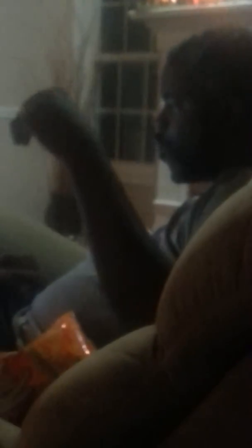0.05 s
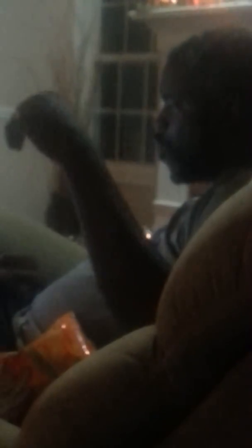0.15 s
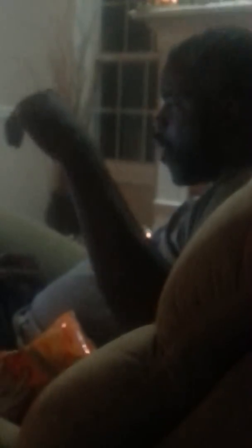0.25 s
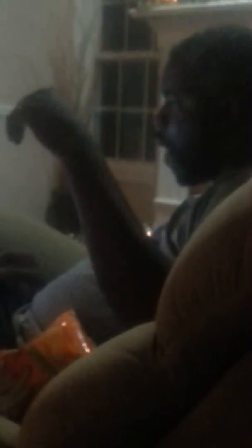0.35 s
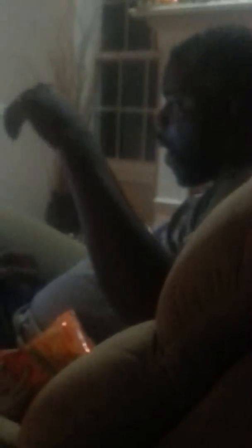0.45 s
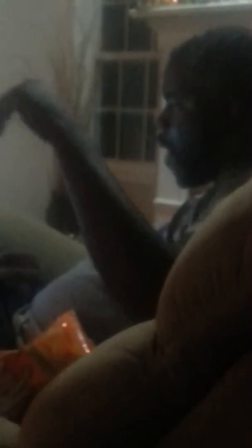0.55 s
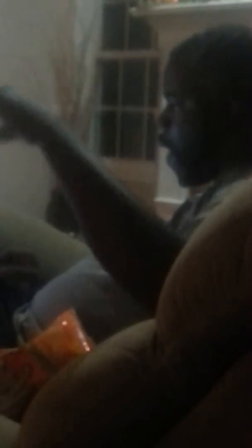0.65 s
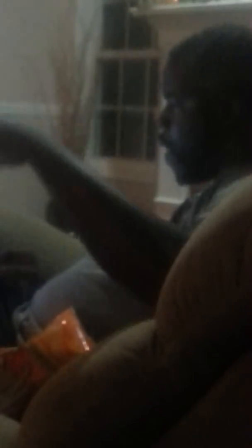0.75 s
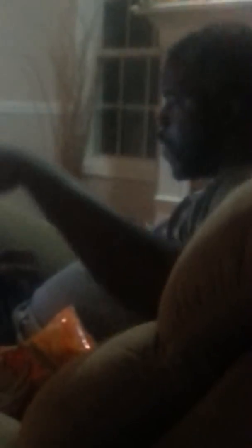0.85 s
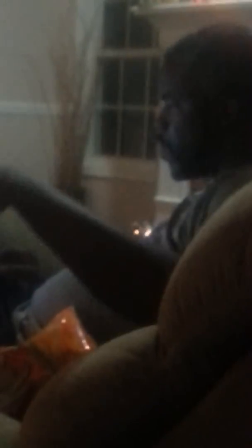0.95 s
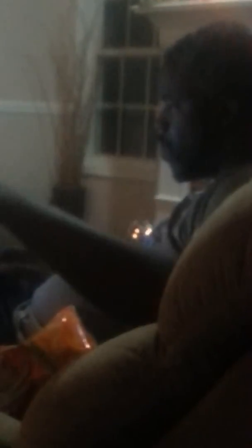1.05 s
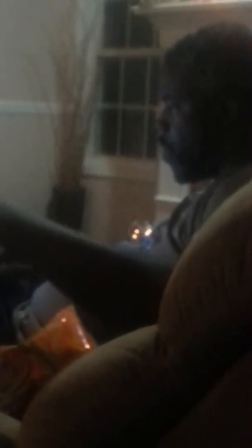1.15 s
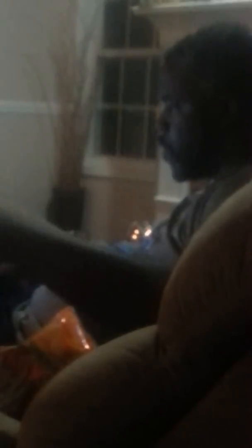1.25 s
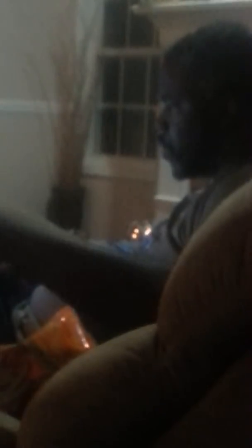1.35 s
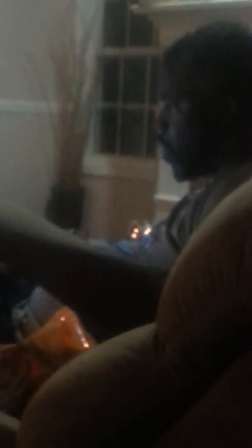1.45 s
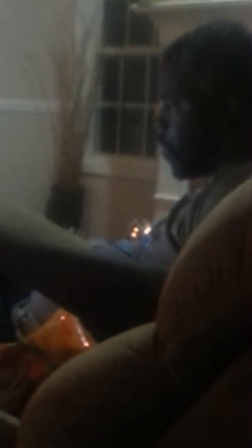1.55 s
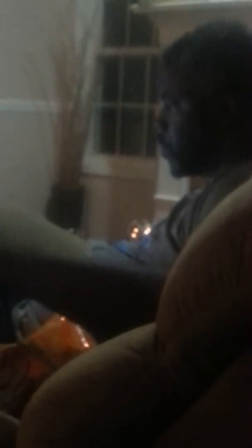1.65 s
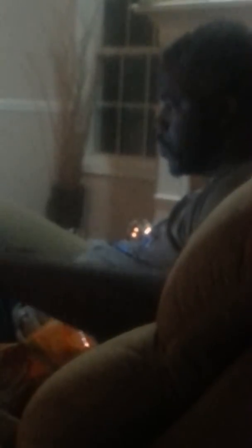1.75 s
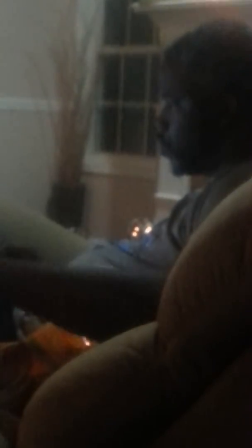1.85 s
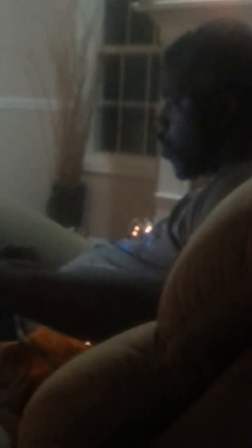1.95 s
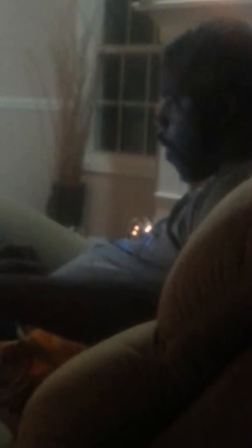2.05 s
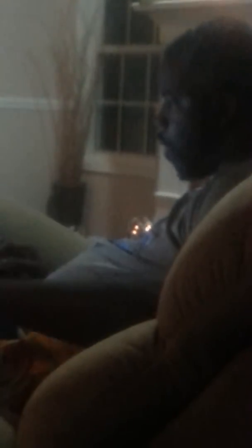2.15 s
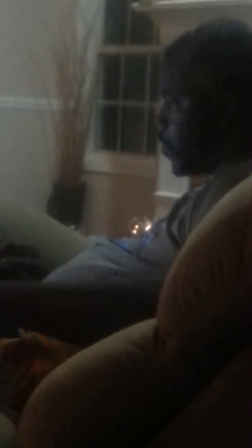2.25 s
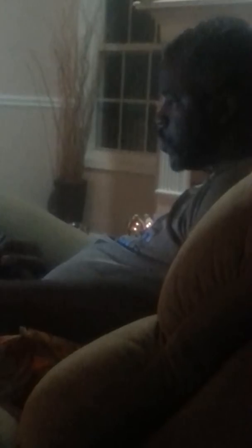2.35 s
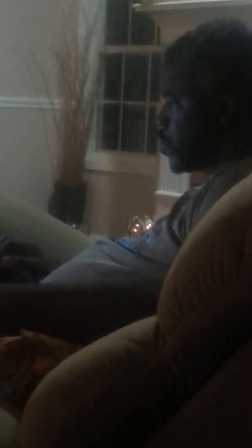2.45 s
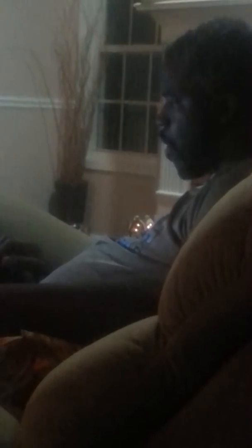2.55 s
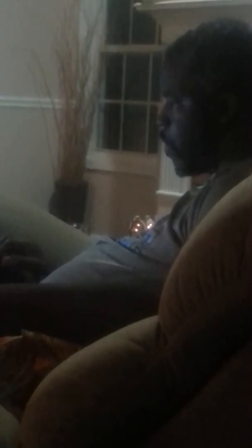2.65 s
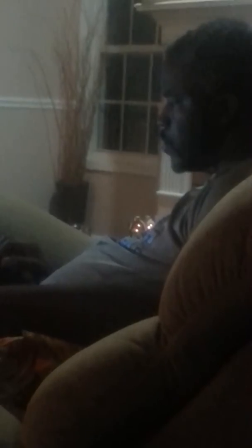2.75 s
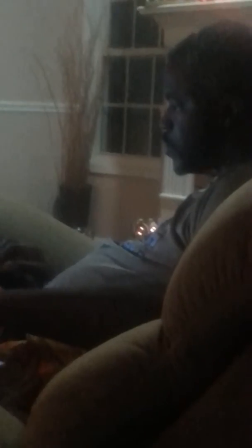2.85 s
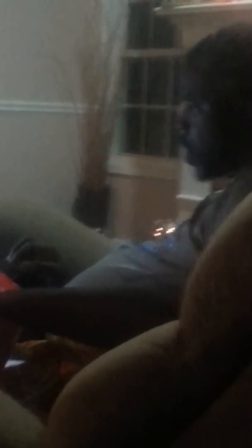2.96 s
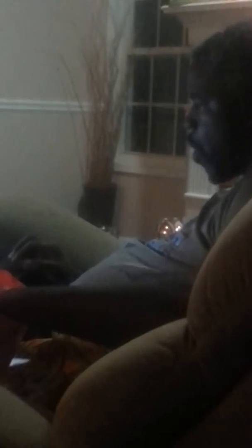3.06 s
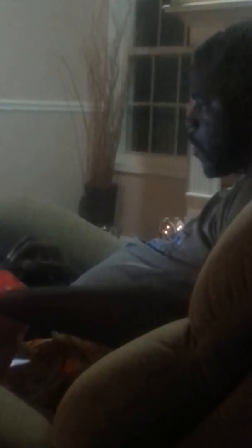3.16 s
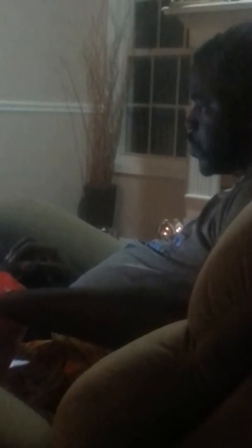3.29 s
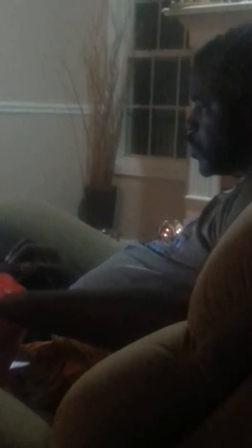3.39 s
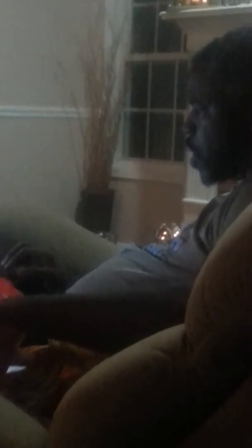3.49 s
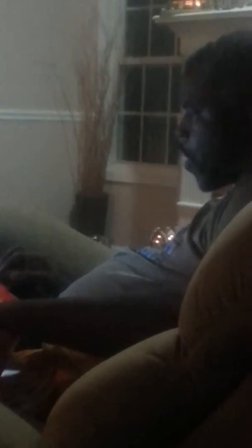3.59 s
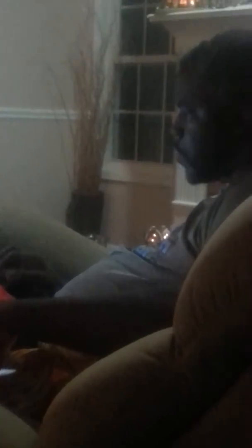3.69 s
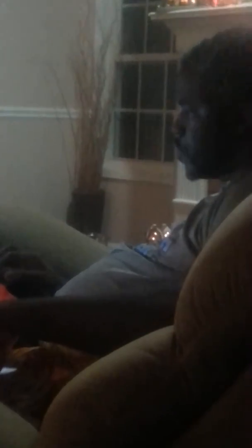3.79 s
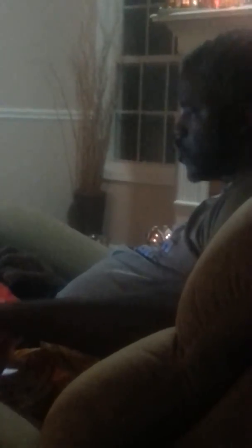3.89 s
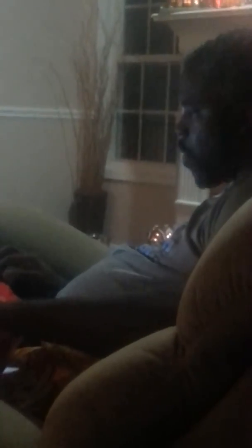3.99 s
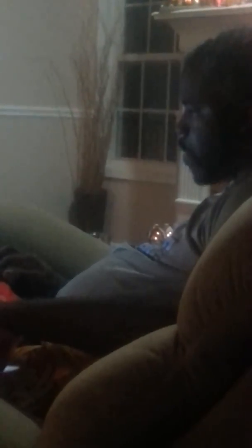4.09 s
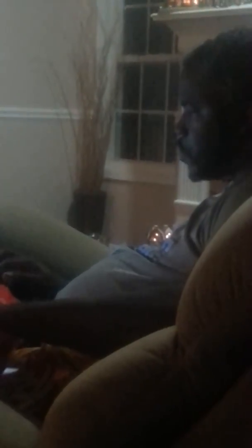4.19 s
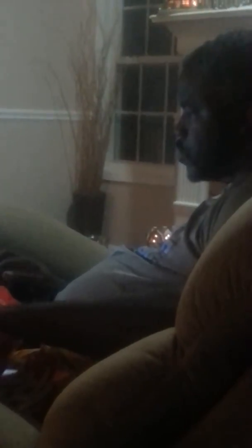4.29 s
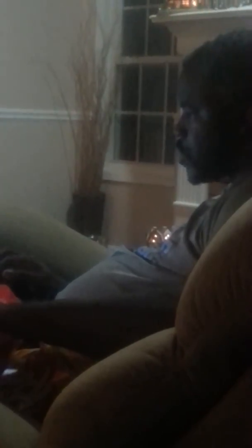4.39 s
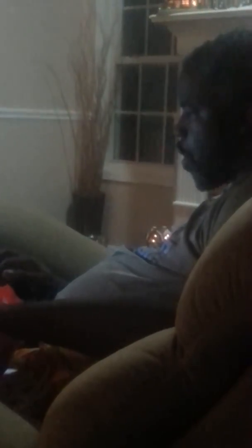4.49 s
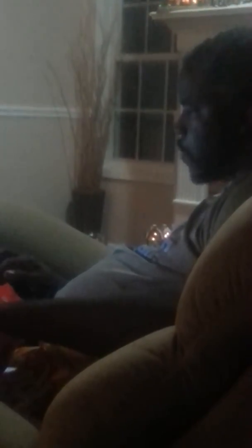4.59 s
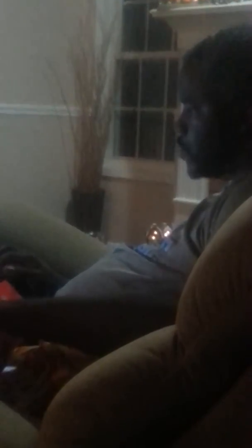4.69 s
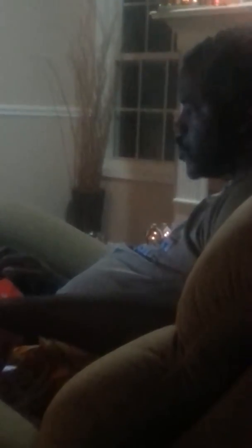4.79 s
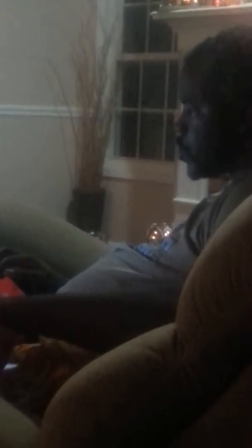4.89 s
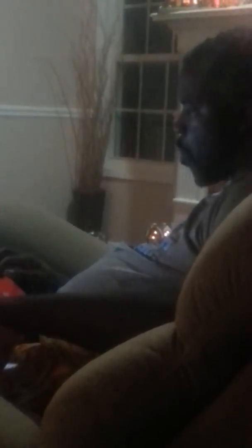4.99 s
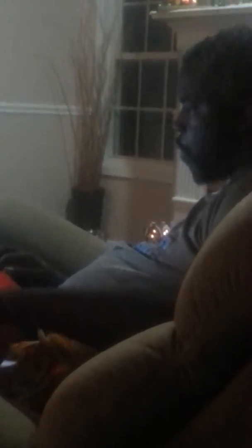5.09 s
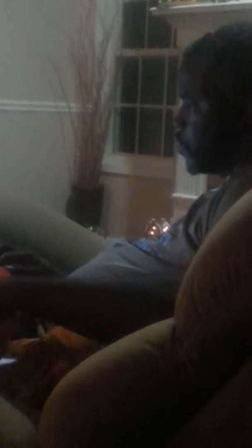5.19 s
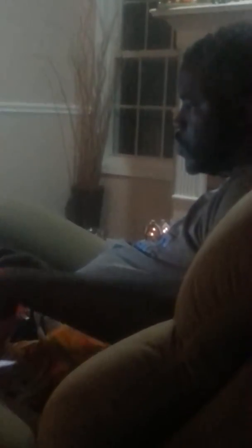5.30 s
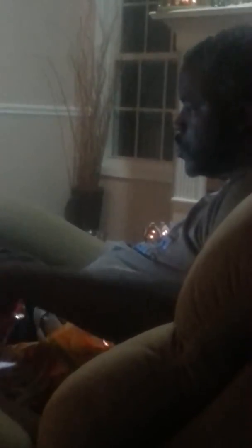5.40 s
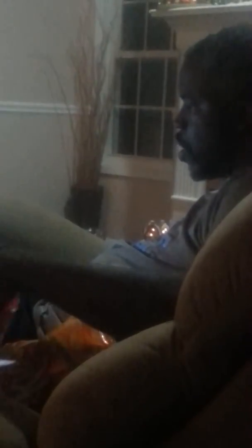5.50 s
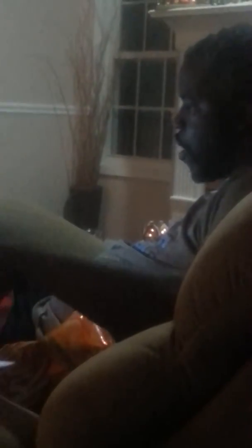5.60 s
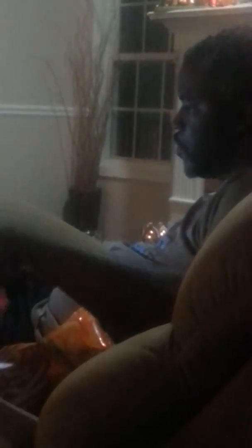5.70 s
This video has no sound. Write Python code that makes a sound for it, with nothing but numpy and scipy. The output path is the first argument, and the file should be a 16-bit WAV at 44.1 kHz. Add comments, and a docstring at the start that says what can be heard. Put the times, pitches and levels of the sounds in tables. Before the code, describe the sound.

In a quiet living room, a hand works in a foil snack bag. After a near-silent start come a few short crinkles, then a long dense dig full of sharp snaps and hollow knocks, then more uneven rustles to the end. Close stereo pickup, crisp treble, slight room echo, faint low air.

```python
"""A hand rummages in a foil snack bag in a quiet living room; the still air is heard throughout.
Short strokes begin: tiny damped buckles crinkle, creases snap, a taut panel sings, noisy walls flap and thud.
One long dig follows, densely crinkled, and hollow knocks of narrow-band noise join from its middle on.
Further strokes carry on to the end over a faint stirring. The room returns echoes and a short delayed tail;
the right microphone port rings in the treble."""
import sys
import numpy as np
from scipy import signal
from scipy.fft import rfft, irfft, next_fast_len
from scipy.io import wavfile
from scipy.ndimage import uniform_filter1d, map_coordinates

SR = 44100
rng = np.random.default_rng(int(sys.argv[2]) if len(sys.argv) > 2 else 0)


def transcribe(signal):
    """Save signal, clipped to [-1, 1], as a 16-bit WAV file at the path in sys.argv[1]."""
    frames = np.atleast_2d(signal).T
    limited = np.clip(frames, -1, 1)
    pcm = np.round(limited * 32767).astype(np.int16)
    wavfile.write(sys.argv[1], SR, pcm)


N = 253134

# Level columns are relative: each source adds its own trim.
# Strokes of the hand. Each row: start in seconds, rise in seconds, fall in seconds,
# then top levels of creases, folds and walls in dB.
STROKE_ROWS = [(.36, .025, 0.048, -61.5, -69.5, -63.5), (0.503, 0.034, 0.046, -48.5, -59, -59),
               (.585, 0.039, 0.14, -47.5, -60, -60.5), (0.737, 0.045, 0.22, -35.5, -45.5, -56),
               (1.18, 0.01, 0.099, -53.5, -68, -66), (1.225, 0.18, .125, -39.5, -50, -55.5),
               (1.572, 0.0053, 0.16, -42.5, -48, -61), (2.609, 0.03, 0.15, -46.5, -54, -59),
               (2.681, 0.064, 0.28, -38, -45, -50), (2.938, .1, 0.1, -38, -44.5, -53.5),
               (3.14, 0.032, 0.13, -38, -46, -50.5), (3.199, 0.12, 0.12, -39, -50.5, -60),
               (3.596, .005, 0.033, -58, -73, -51), (3.676, 0.1, 0.084, -39, -52, -59),
               (3.93, 0.062, 0.14, -50.5, -55, -58), (4.11, 0.11, 0.06, -43, -54.5, -56),
               (4.286, 0.013, 0.073, -43, -50, -57.5), (4.41, 0.042, 0.1, -47.5, -53, -61),
               (4.525, 0.024, .06, -52, -51, -55.5), (4.6, 0.044, 0.17, -42, -55, -58.5),
               (4.75, .036, 0.047, -50.5, -57, -67), (4.85, 0.011, 0.14, -52.5, -64, -59.5),
               (4.994, 0.013, 0.04, -49.5, -56, -52.5), (5.07, 0.037, 0.029, -57, -64, -66),
               (5.152, .028, 0.028, -47, -50, -58.5), (5.222, 0.0069, .06, -35.5, -44.5, -50.5),
               (5.25, 0.043, 0.22, -45.5, -57, -59.5), (5.487, .025, 0.2, -42, -51, -58.5),
               (5.672, 0.072, .1, -39.5, -48, -57.5)]
# One long dig to the bottom of the bag. Each row: time in seconds, creases, folds and walls in dB.
DIG_CURVE = [(1.635, -55, -60, -60), (1.675, -35, -40.5, -47), (1.895, -44, -48.5, -54.5),
             (2.025, -38, -46.5, -53), (2.1, -40.5, -52.5, -61), (2.2, -36, -49.5, -53.5),
             (2.315, -39, -53, -58), (2.475, -44, -49.5, -53.5), (2.62, -55, -56.5, -61)]
# Faint stirring under the strokes. Each row: time in seconds, creases, folds and walls in dB.
STIR_CURVE = [(1.25, -65, -79, -65.5), (5.74, -67, -75, -68.5)]
# Loudest creases snapping through. Each row: time in seconds, crack in dB, panel in dB, panel pitch in Hz.
SNAP_ROWS = [(.6118, -37, -53, 5100), (.7405, -43, -55, 4100), (.7768, -37, -57, 5000),
             (.8047, -28, -39, 3300), (1.2085, -44, -57.5, 2300), (1.3617, -32, -40, 3300),
             (1.5731, -30.5, -47, 4300), (1.6655, -23, -44.5, 2980), (1.6777, -26.5, -48, 4100),
             (1.7139, -29, -34.5, 3000), (1.8168, -30, -34.5, 3500), (1.8281, -32, -36, 2600),
             (1.8403, -23, -29.5, 1900), (2.0317, -27, -40, 3500), (2.152, -31, -48, 5000),
             (2.1774, -17, -30, 4900), (2.1883, -28, -50, 4600), (2.2293, -35, -50, 4500),
             (2.3409, -28, -48, 4800), (2.3844, -32, -55, 4300), (2.4082, -27, -35, 3400),
             (2.4115, -25.5, -44, 3800), (2.451, -27, -47, 4700), (2.476, -20.5, -23.5, 4500),
             (2.5238, -21.5, -35, 3750), (2.5439, -39, -36.5, 3330), (2.7399, -14.5, -29, 4900),
             (2.7695, -28, -32, 2880), (2.8245, -22.5, -34.5, 4000), (2.9336, -30.5, -39, 3660),
             (3.0005, -29, -33.5, 3220), (3.0376, -21, -34.5, 2400), (3.1317, -32.5, -38.5, 2700),
             (3.1657, -37, -31.5, 2750), (3.2301, -33, -52, 4600), (3.3975, -23.5, -28, 3870),
             (3.5968, -30.5, -35.5, 3130), (3.958, -40, -54, 3900), (4.0004, -41, -44, 2700),
             (4.008, -42, -40, 2900), (4.0303, -36, -42.5, 2300), (4.2028, -39, -48, 2400),
             (4.2089, -27.5, -38, 2040), (4.2852, -23.5, -37.5, 3050), (4.414, -44, -66, 4400),
             (4.4535, -49, -43, 1800), (4.5, -36, -47.5, 4800), (4.5372, -31.5, -43.5, 3180),
             (4.858, -38.5, -60, 1700), (4.872, -36, -37, 3070), (4.895, -30.5, -36.5, 3400),
             (5.0056, -30.5, -36, 3230), (5.159, -41, -42.5, 3960), (5.2224, -27.5, -33.5, 2700),
             (5.2253, -20.5, -29, 2660), (5.2358, -26, -44, 4100), (5.3603, -29, -36, 4740),
             (5.5022, -41, -44, 2500), (5.541, -41, -52, 4000), (5.7316, -21.5, -35, 5000)]
# The hand bumps the slack bag. Each row: time in seconds, level in dB.
BUMP_ROWS = [(.797, -47.5), (1.19, -50.5), (1.657, -44.5), (1.945, -44), (2.03, -49), (2.742, -41.5),
             (3.0, -38.5), (4.195, -51), (4.865, -49.5), (5.232, -48.5), (5.722, -46)]
# Hollow knocks in the bag. Each row: time in seconds, level in dB, pitch in Hz, t60 in seconds.
KNOCK_ROWS = [(2.341, -37, 650, 0.12), (2.783, -38, 824, 0.16), (3.038, -28.5, 794, 0.073),
              (3.278, -44, 956, 0.34), (3.761, -42.5, 1000, 0.18), (4.634, -46, 900, 0.14),
              (4.793, -49.5, 814, 0.13)]
# Fingers scrape a taut panel. Each row: centre in seconds, half length in seconds, pitch in Hz, level in dB.
SCRAPE_ROWS = [(.81, .044, 2300, -56), (.83, .052, 3440, -51), (1.34, .075, 2750, -55),
               (1.43, .025, 5500, -46), (1.73, .04, 2220, -50), (2.432, .025, 2400, -49.5)]
# Spectrum of fine creases. Each row: frequency in Hz, relative density in dB per Hz.
CREASE_SPECTRUM = [(1500, -18), (3500, -6.5), (4800, 0.5), (6300, 0), (9000, -1), (11000, -6), (14500, -9)]
# Spectrum of broad folds. Each row: frequency in Hz, relative density in dB per Hz.
FOLD_SPECTRUM = [(300, -18), (700, -5), (950, -5), (1300, -3), (1800, 0), (2600, 1.5), (3700, 1.5),
                 (4600, -7), (7000, -32)]
# Spectrum of the slack walls. Each row: frequency in Hz, relative density in dB per Hz.
WALL_SPECTRUM = [(20, -13), (55, -9), (90, -6), (140, 1), (220, -2), (330, -1.5), (500, -7), (800, -10),
                 (1500, -12), (4000, -66)]
# Spectrum of a crack before brightening. Each row: frequency in Hz, relative density in dB per Hz.
CRACK_SPECTRUM = [(1500, -15.5), (3500, -32), (5000, 3.5), (6500, 7.5), (9000, -5), (14500, -13.5)]
# Spectrum of the still air. Each row: frequency in Hz, relative density in dB per Hz.
AIR_SPECTRUM = [(15, -42), (25, -17), (60, -11), (130, -4), (170, -6.5), (205, 1.5), (250, -10.5),
                (335, -3.5), (515, -14.5), (1400, -22), (12800, -29), (15000, -27)]
# Left-right correlation of diffuse sound. Each row: frequency in Hz, correlation from 0 to 1.
ALIKE_CURVE = [(60, 0.73), (200, 0.81), (400, 0.45), (800, 0.1), (2400, 0.01), (5000, 0.03), (9000, 0)]
# Decay of the room's tail. Each row: frequency in Hz, t60 in seconds.
ROOM_DECAY = [(150, 0.55), (1000, 0.35), (5000, 0.25), (14000, 0.22)]
# Early reflections. Each row: delay in seconds, relative level in dB.
ECHO_ROWS = [(.0075, -20), (0.0139, -13.5), (0.0153, -11), (0.0189, -11.5), (.0275, -21), (0.036, -19)]
# Colour of the left port. Each row: centre in Hz, width in Hz, gain in dB.
LEFT_PEAKS = [(7600, 1700, -0.5), (12750, 3600, 4.5), (2600, 340, 1.5), (250, 600, 2)]
# Colour of the right port. Each row: centre in Hz, width in Hz, gain in dB.
RIGHT_PEAKS = [(7437, 1510, 13), (13700, 8600, 0.5), (4300, 5600, -3), (1360, 1700, -0.5)]

STROKE_RANGE_DB = 20.5  # creases and folds, from start to top and from top to end of fall
WALL_FOLLOW = 0.5  # walls move through this share of the range
RISE_BEND, FALL_BEND = 1.74, 1.49  # above 1 the top of a stroke is rounded
TICKS_PER_S, TICK_SCATTER_DB = 16, 3
TICK_CRACK_DB, TICK_PANEL_DB = 2, 1.5  # over the creases and over the folds
TICK_LOW_HZ, TICK_HIGH_HZ = 2010, 4800
TIGHT_DB_PER_DB, TIGHT_FROM_DB = 0.17, 6  # treble gain per dB of crack over panel beyond this
BRIGHT_HZ = 9600
BUMP_ATTACK_S, BUMP_T60_S, BUMP_TRIM_DB = 0.0032, 0.12, -1
KNOCK_HALF_WIDTH_HZ, KNOCK_ROUGH_DB = 115, 0.5  # half width at half amplitude
FLOOR_DB = -69.5
TOP_HZ = 14600


def amp(db):
    """Decibels to gain."""
    return 10 ** (np.asarray(db) / 20)


def unit(x):
    """Scale to rms 1."""
    return x / np.sqrt(np.mean(x ** 2) + 1e-20)


def along(points, hz):
    """Interpolate (Hz, value) points on a log frequency axis."""
    f, v = np.transpose(points)
    return np.interp(np.log(hz + 1), np.log(f + 1), v)


def filtered(x, response):
    """Apply a complex response of frequency."""
    m = next_fast_len(N + SR // 2)
    return irfft(rfft(x, m) * response(np.fft.rfftfreq(m, 1 / SR)), m)[..., :N]


def causal(x, gain):
    """Colour a short burst with minimum phase, so that its energy follows the onset."""
    size = x.shape[-1]
    log_gain = np.log(np.maximum(gain(np.fft.rfftfreq(size, 1 / SR)), 1e-4))
    fold = 1 + np.sign(size // 2 - np.arange(size)) * (np.arange(size) > 0)
    return irfft(rfft(x) * np.exp(rfft(irfft(log_gain) * fold)))


def add(track, start_s, sound):
    """Mix a sound into a stereo track at a time."""
    part = track[:, max(round(start_s * SR), 0):]
    part[:, :sound.shape[-1]] += sound[..., :part.shape[1]]


def spread(pair, spectrum):
    """Two unrelated signals become mid and side of one coloured stereo sound of rms 1."""
    def response(hz):
        turn = np.arccos(np.clip(along(ALIKE_CURVE, hz), -1, 1)) / 2
        return amp(along(spectrum, hz)) * np.array([np.cos(turn), np.sin(turn)])
    mid, side = filtered(pair, response)
    return unit(np.array([mid + side, mid - side]))


def clumps(knots_per_s):
    """Smooth random curve through softly limited knots."""
    knots = 2 * np.tanh(rng.standard_normal(4096) / 2)
    return map_coordinates(knots, [np.arange(N) * knots_per_s / SR], mode="wrap")


def handling():
    """Crease, fold and wall levels in dB: powers of dig, stirring and strokes add; walls swell less steeply."""
    t = np.arange(N) / SR
    power = np.zeros((3, N))
    for curve in (DIG_CURVE, STIR_CURVE):
        s, *columns = np.transpose(curve)
        inside = (t > s[0]) * (t < s[-1])
        power += np.array([amp(np.interp(t, s, c)) ** 2 for c in columns]) * inside
    for start_s, rise_s, fall_s, *top_db in STROKE_ROWS:
        age = t - start_s - rise_s  # zero at the top
        near = (age > -2 * rise_s) & (age < 2 * fall_s + .1)
        before = np.maximum(-age[near] / rise_s, 0) ** RISE_BEND
        after = np.maximum(age[near] / fall_s, 0) ** FALL_BEND
        drop_db = STROKE_RANGE_DB * np.outer([1, 1, WALL_FOLLOW], before + after)
        power[:, near] += amp(np.array(top_db)[:, None] - drop_db) ** 2
    return 10 * np.log10(power + 1e-12)


def crinkle(spectrum, grains_per_s, low_hz, high_hz, life_s, size_db, slide_db):
    """Tiny buckles, each a damped ring of its own pitch and size, over the hiss of sliding foil."""
    count = int(np.clip(grains_per_s, 10, 4000) * N / SR)
    when, pitch, size, left, right = rng.random((count, 5)).T[:, :, None]
    t = np.arange(128) / SR
    hz = low_hz + (high_hz - low_hz) * pitch
    # exponential spread of sizes in dB, capped
    height = amp(size_db * np.minimum(-np.log(1 - size), np.pi + 1))
    fade = height * np.exp(-t / life_s)
    at = (when * N).astype(int) + np.arange(len(t))
    grains = []
    for phase in (left, right):
        ring = fade * np.sin(2 * np.pi * (hz * t + phase))
        grains.append(np.bincount(at.ravel(), ring.ravel(), N)[:N])
    hiss = spread(rng.standard_normal((2, N)), spectrum)
    return unit(spread(np.array(grains), spectrum) + amp(slide_db) * hiss)


def reshaped(x, patchy_db):
    """As the bag changes shape, resonances come and go: a smoothed random gain over time and frequency."""
    z = signal.stft(x, nperseg=512)[2]
    field = rng.standard_normal(z.shape[1:])
    for _ in range(2):
        field = uniform_filter1d(uniform_filter1d(field, size=5, axis=0), size=18, axis=1)
    return signal.istft(z * amp(patchy_db * unit(field)), nperseg=512)[1][:, :N]


def rustle(levels):
    """The hand crushes fine creases and broad folds in shared little flurries, and moves the walls."""
    fine_db, fold_db, wall_db = levels
    flurry = clumps(knots_per_s=90)
    fine = crinkle(CREASE_SPECTRUM, grains_per_s=800, low_hz=3500, high_hz=14160,
                   life_s=0.00093, size_db=3.5, slide_db=2.5)
    folds = crinkle(FOLD_SPECTRUM, grains_per_s=400, low_hz=704, high_hz=4800,
                    life_s=0.00075, size_db=3.5, slide_db=0)
    walls = spread(rng.standard_normal((2, N)), WALL_SPECTRUM)
    fine = unit(reshaped(fine, patchy_db=0.7))
    folds = unit(reshaped(folds, patchy_db=2.1))
    foil = amp(fine_db - 4.0 + 1.4 * flurry) * fine + amp(fold_db - 2.78 + 1.3 * flurry) * folds
    return foil + amp(wall_db - 4.5 + 0.8 * flurry) * walls


def burst(gain, life_s, alike, spike=1):
    """Stereo tick with the energy of 1 ms at rms 1: a sharp release, then a fading shiver."""
    t = np.arange(1024) / SR
    shared, *own = rng.standard_normal((3, len(t)))
    share = np.clip(alike, 0, 1)
    shiver = (np.sqrt(share) * shared + np.sqrt(1 - share) * np.array(own)) * np.exp(-t / life_s)
    release = spike * np.sqrt(life_s * SR / 2) * (t == 0)
    tick = causal(shiver + release, gain)
    return tick / np.sqrt(np.sum(tick ** 2, axis=1, keepdims=True) / (SR / 1000))


def snaps(rows):
    """A crease flips with a crack, brighter when tighter; its panel rings briefly and pushes a little air."""
    out = np.zeros((2, N))
    for start_s, crack_db, panel_db, panel_hz in rows:
        bright_db = TIGHT_DB_PER_DB * (crack_db - panel_db - TIGHT_FROM_DB)

        def crack_gain(hz):
            shelf = 1 - 1 / (1 + (hz / BRIGHT_HZ) ** 6)
            return amp(along(CRACK_SPECTRUM, hz) + bright_db * shelf)

        def panel_gain(hz):
            resonance = 1 / np.hypot(1, 1.57 * (hz / panel_hz - panel_hz / (hz + 1)))
            return resonance / np.hypot(1, (hz / 4800) ** 4)

        crack = burst(crack_gain, life_s=0.0014, alike=0.27, spike=0.54)
        panel = burst(panel_gain, life_s=0.0028, alike=0.73, spike=0.49)
        push = burst(lambda hz: amp(along(WALL_SPECTRUM, hz)), life_s=0.0056, alike=0.74, spike=0.32)
        add(out, start_s, amp(crack_db - 5.0) * crack + amp(panel_db + 1) * panel + amp(panel_db - 13) * push)
    return out


def ticks(levels):
    """Rows for snaps of lesser creases at random moments, as strong as the handling is just then."""
    when, pitch, crack, panel = rng.random((int(TICKS_PER_S * N / SR), 4)).T
    at = (when * N).astype(int)
    crack_db = levels[0, at] + TICK_CRACK_DB + TICK_SCATTER_DB * (2 * crack - 1)
    panel_db = levels[1, at] + TICK_PANEL_DB + TICK_SCATTER_DB * (2 * panel - 1)
    panel_hz = TICK_LOW_HZ + (TICK_HIGH_HZ - TICK_LOW_HZ) * pitch
    return np.transpose([at / SR, crack_db, panel_db, panel_hz])


def bumps():
    """A soft blow sets the walls flapping: a low noise thud that dies quickly."""
    out, t = np.zeros((2, N)), np.arange(8192) / SR
    flap = spread(rng.standard_normal((2, N)), WALL_SPECTRUM)
    shape = (1 - np.exp(-t / BUMP_ATTACK_S)) * amp(-60 * t / BUMP_T60_S)
    for k, (start_s, db) in enumerate(BUMP_ROWS):
        piece = flap[:, k * len(t):][:, :len(t)]
        add(out, start_s, amp(db + BUMP_TRIM_DB) * shape * unit(piece))
    return out


def knocks():
    """Hollow notes of the half-empty bag: decaying narrow-band noise, fuzzy and grainy."""
    out, t = np.zeros((2, N)), np.arange(8192) / SR
    for start_s, db, pitch_hz, t60_s in KNOCK_ROWS:
        note = causal(rng.standard_normal((3, len(t))),
                      lambda hz: 1 / (1 + ((hz - pitch_hz) / KNOCK_HALF_WIDTH_HZ) ** 2))
        grain = amp(KNOCK_ROUGH_DB * clumps(knots_per_s=200)[:len(t)])
        stereo = unit(grain * (note[0] + 0.8 * note[1:]))
        add(out, start_s, amp(db - 9.5 - 60 * t / t60_s) * stereo)
    return out


def scrapes():
    """Uneven friction swells and fades in one narrow resonance of the foil."""
    out, t = np.zeros((2, N)), np.arange(N) / SR
    friction = rng.standard_normal((3, N)) * amp(4.7 * clumps(knots_per_s=140))
    for centre_s, half_s, pitch_hz, db in SCRAPE_ROWS:
        near = np.abs(t - centre_s) < 3 * half_s + .01
        b, a = signal.iirpeak(pitch_hz, 5.5, SR)
        rub = friction[0, near] + 0.61 * friction[1:, near]
        ring = signal.lfilter(b, a, signal.lfilter(b, a, rub))
        out[:, near] += amp(db) * unit(ring) * np.exp(-((t[near] - centre_s) / half_s) ** 2)
    return out


def room(x, early_db, tail_db, gap_s=0.012):
    """Nearby surfaces return distinct echoes; a diffuse tail, decaying by frequency, starts after a gap."""
    hz, t, z = signal.stft(rng.standard_normal((2, SR // 2)), SR, nperseg=256)
    decay = amp(-60 * t / along(ROOM_DECAY, hz)[:, None])
    tail = signal.istft(z * decay, SR, nperseg=256)[1]
    tail = np.pad(tail, ((0, 0), (int(abs(gap_s) * SR), 0)))
    response = amp(tail_db) * tail / np.linalg.norm(tail[0])
    for delay_s, db in ECHO_ROWS:
        echo = burst(np.ones_like, life_s=0.0004, alike=0.21)
        add(response, delay_s, amp(db + early_db) * echo / np.linalg.norm(echo[0]))
    wet = signal.fftconvolve(x, response, axes=1)[:, :N]
    # long waves reach both ports more alike
    return wet + filtered(wet[::-1] - wet, lambda hz: 0.33 / (1 + (hz / 600) ** 2))


def still_air():
    """Steady coloured noise of the quiet room."""
    return amp(FLOOR_DB) * spread(rng.standard_normal((2, N)), AIR_SPECTRUM)


def scene():
    """The bag, its echoes and the still air of the room."""
    levels = handling()
    crackle = snaps(SNAP_ROWS) + snaps(ticks(levels))
    bed = rustle(levels) + bumps() + knocks() + scrapes()
    crackle_room = room(crackle, early_db=-3.0, tail_db=-8.5)
    bed_room = room(bed, early_db=-5.5, tail_db=-9.0)
    return crackle + crackle_room + bed + bed_room + still_air()


def port(peaks, hz):
    """Resonant peaks and dips of one microphone port, multiplied together."""
    def bell(centre_hz, width_hz, db):
        detune = centre_hz ** 2 - hz * hz
        damping = 1j * hz * width_hz
        return (detune + damping * amp(db / 2)) / (detune + damping / amp(db / 2))
    return np.prod([bell(*peak) for peak in peaks], axis=0)


def record(dry):
    """Each port colours its channel; a steep low-pass sets the band limit."""
    coloured = filtered(dry, lambda hz: np.array([port(LEFT_PEAKS, hz), port(RIGHT_PEAKS, hz)]))
    return filtered(coloured, lambda hz: 1 / np.hypot(1, (hz / TOP_HZ) ** 110))


dry = scene()
out = record(dry)
transcribe(out)
```